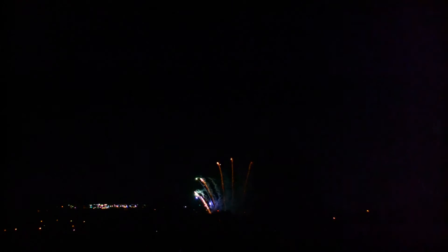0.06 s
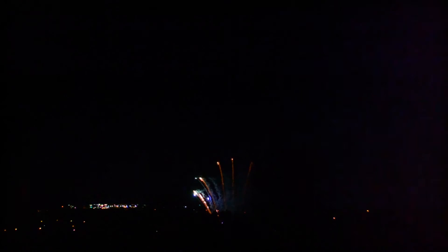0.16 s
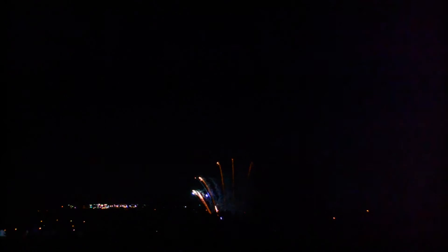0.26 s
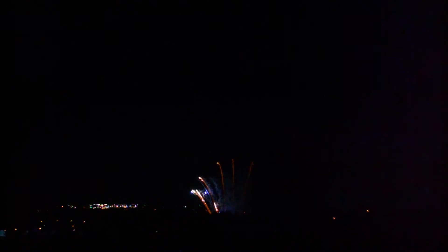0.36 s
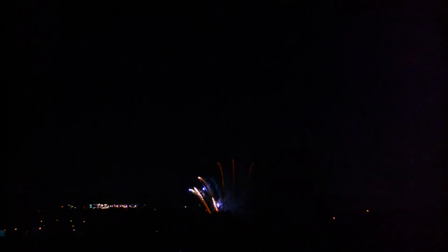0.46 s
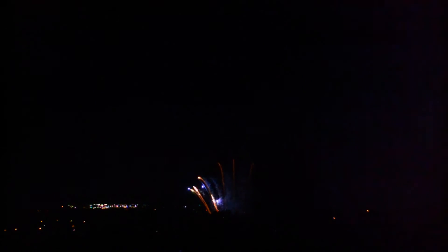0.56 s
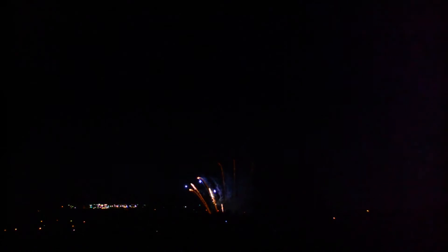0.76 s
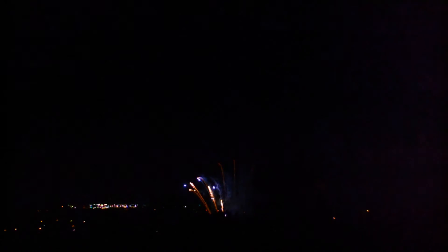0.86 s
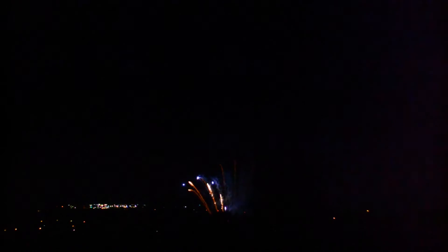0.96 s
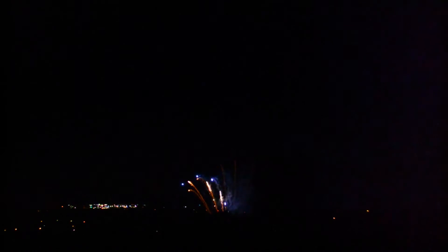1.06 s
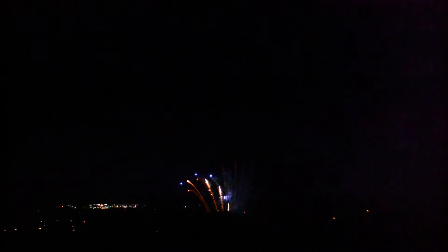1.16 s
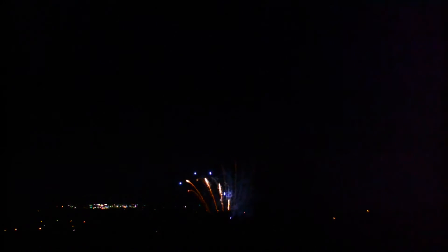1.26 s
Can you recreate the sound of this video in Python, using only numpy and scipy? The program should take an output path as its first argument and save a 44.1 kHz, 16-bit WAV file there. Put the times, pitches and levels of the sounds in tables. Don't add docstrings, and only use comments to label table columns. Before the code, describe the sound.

Two distant firework shells bang hard in quick succession over faint crackle, then rumble away.

```python
import sys
import numpy as np
from scipy import signal
from scipy.fft import rfft, irfft
from scipy.io import wavfile
from scipy.ndimage import uniform_filter1d

SR = 44100
rng = np.random.default_rng(int(sys.argv[2]) if len(sys.argv) > 2 else 0)


def dump(signal):
    limited = np.clip(np.atleast_2d(signal).T, -1, 1)
    pcm = np.round(limited * 32767).astype(np.int16)
    wavfile.write(sys.argv[1], SR, pcm)


def ratio(d):
    e = np.asarray(d, float) / 20
    return 10 ** e


N = 57330


def at_hz(points, hz):
    table_hz, value = np.transpose(points)
    return np.interp(np.log(hz + 1), np.log(table_hz), value)


def colour(x, points):
    hz = np.arange(N // 2 + 1) * SR / N
    y = irfft(rfft(x) * ratio(at_hz(points, hz)), N)
    return y / np.sqrt(np.mean(y ** 2))


def since(start_s):
    return np.maximum(np.arange(N) / SR - start_s, 0)


def swell(start_s, rise_s, fall_s):
    t = since(start_s)
    return (1 - np.exp(-t / rise_s)) * np.exp(-t / fall_s)


def grains(rate_per_s, spread_db):
    hits = rng.random(N) < rate_per_s / SR
    size = ratio(spread_db * np.minimum(rng.exponential(1, N), 4))
    return hits * size * rng.choice([-1, 1], N)


def snap(start_s, peak_db, pitch_hz):
    cycles = since(start_s) * pitch_hz
    bell = np.exp(-((cycles - .65) / .6) ** 2)
    return -ratio(peak_db + 1) * np.sin(2 * np.pi * cycles) * bell * (cycles < 3)


FLICKER_DB, FLICKER_PER_S = 0.93, 27


def flicker():
    knots = rng.standard_normal(int(N / SR * 60) + 2)
    place = np.arange(N) / SR * FLICKER_PER_S
    return ratio(FLICKER_DB * np.interp(place, np.arange(len(knots)), knots))


# time in seconds, level in dB.
STAR_VIGOUR = [(0, -32.5), (.06, -31.5), (0.099, -32.5), (.13, -31.5), (0.199, -32.5), (.6, -31.5),
               (.84, -33.5), (.9, -35.5), (1.22, -38.5), (1.3, -35.5)]
# frequency in Hz, level in dB per Hz.
CRACKLE_SPECTRUM = [(30, -15.5), (100, -18.5), (230, -14), (850, -1), (2700, -4), (5000, -11),
                    (7500, -25.5), (10000, -44.5)]
# start in seconds, peak in dB.
LOUD_POPS = [(.0218, -21), (.0585, -21), (.0612, -18), (.0785, -20), (.1162, -22), (.1238, -21),
             (.1388, -18), (.1638, -21), (.1732, -22), (.1873, -21), (.835, -23), (.865, -23), (.9565, -25),
             (.996, -25), (1.285, -25)]
POPS_PER_S, POP_SPREAD_DB, POP_HZ = 4500, 3.5, 2300


def crackle():
    level_db = np.interp(np.arange(N) / SR, *np.transpose(STAR_VIGOUR))
    out = ratio(level_db) * flicker() * colour(grains(POPS_PER_S, POP_SPREAD_DB), CRACKLE_SPECTRUM)
    for start_s, peak_db in LOUD_POPS:
        out += snap(start_s, peak_db - 1.5, POP_HZ * rng.uniform(.7, 1.4))
    return out


# start in seconds, strength in dB, blast length in seconds,
# ground bounce in dB, second bounce in dB.
SHELLS = [
    (.2418, 22, .001, -1.2, -9),
    (.38596, 20.8, .0013, -2.8, -15),
]
# ground bounce in seconds, second bounce in seconds.
BOUNCE_LAG_S = [
    (.00311, .00554),
    (.00319, .0056),
]
AIR_CUT_HZ, MIC_CUT_HZ, MIC_Q = 1700, 198, 1.22


def blasts():
    out = np.zeros(N)
    for (start_s, db, length_s, *bounce_db), lags_s in zip(SHELLS, BOUNCE_LAG_S):
        for lag_s, loss_db in zip((0, *lags_s), (0, *bounce_db)):
            t = since(start_s + lag_s)
            u = t / length_s
            onset = np.minimum(t * SR, 1)
            out -= ratio(db + loss_db) * (1 - u) * np.exp(-u) * onset
    w = 2 * np.pi * MIC_CUT_HZ
    b, a = signal.bilinear([1, 0, 0], [1, w / MIC_Q, w * w], SR)
    out = signal.lfilter(b, a, out + 1e-18)
    out = signal.lfilter(b, a, out)
    return signal.lfilter(*signal.butter(2, AIR_CUT_HZ, fs=SR), out)


# frequency in Hz, level in dB per Hz.
RUMBLE_SPECTRUM = [(25, -45), (45, -17), (177, 1), (400, -4), (650, 1), (1830, -4), (5000, -19),
                   (10500, -24.5)]
# frequency in Hz, time to fall 60 dB in seconds.
RUMBLE_T60_S = [(60, 3.45), (250, 1.42), (800, 2.5), (3000, 2.23), (9000, 1.5)]
# frequency in Hz, level in dB per Hz.
FAR_SPECTRUM = [(30, -25), (140, -15), (380, 1.5), (750, 2.5), (2000, -7.5), (4300, -22), (7500, -44.5),
                (10000, -51.5)]
RUMBLE_DB, RUMBLE_RISE_S = -20.5, 0.01
FAR_DB, FAR_RISE_S, FAR_T60_S = -26.5, 0.55, 19


def rumble():
    spectrum = rfft(colour(rng.standard_normal(N), RUMBLE_SPECTRUM))
    hz = np.arange(N // 2 + 1) * SR / N
    near = np.zeros(N)
    for centre_hz in 40 * 2. ** np.arange(9):
        octave = np.clip(1 - abs(np.log2((hz + 1) / centre_hz)), 0, 1)
        band = irfft(spectrum * octave, N)
        fall_s = at_hz(RUMBLE_T60_S, centre_hz) / np.log(1000)
        power = sum(swell(shell[0], RUMBLE_RISE_S, fall_s) ** 2 for shell in SHELLS)
        near += band * np.sqrt(power)
    far = swell(SHELLS[0][0], FAR_RISE_S, FAR_T60_S / np.log(1000))
    far = far * colour(rng.standard_normal(N), FAR_SPECTRUM)
    return ratio(RUMBLE_DB) * near + ratio(FAR_DB) * far


# start in seconds, peak in dB, pitch in Hz.
SLAPS = [(.2487, -7, 1600), (.2499, -6, 1800), (.2520, -7, 1400), (.2553, -7, 3200), (.2657, -9, 2800),
         (.2817, -5, 1900), (.3010, -9, 1200), (.3051, -8, 1400), (.4013, -10, 3000), (.4084, -8, 900),
         (.4121, -12, 3000), (.4463, -9, 2500), (.5148, -12, 900)]


def slaps():
    return sum(snap(*row) for row in SLAPS)


# lag in seconds, level in dB, dying time in seconds.
WALLS = [
    (.007, -12.5, 0.009),
    (.023, -16.5, 0.0071),
    (0.038, -16.5, 0.017),
    (0.055, -15, 0.045),
    (0.092, -21.5, 0.041),
    (0.242, -27.5, .03),
]
WALL_SHARE_DB = (1, 2)
# frequency in Hz, level in dB per Hz.
WALL_SPECTRUM = [(50, -43), (110, -6), (190, -2), (250, -3), (620, 0), (3150, -11), (7000, -23.5),
                 (10500, -21)]
WALL_RISE_S, FACETS_PER_S, FACET_SPREAD_DB = 0.00067, 2700, 1.5


def walls():
    power = np.zeros(N)
    for shell, share_db in zip(SHELLS, WALL_SHARE_DB):
        for lag_s, db, fall_s in WALLS:
            power += (ratio(db + share_db) * swell(shell[0] + lag_s, WALL_RISE_S, fall_s)) ** 2
    return np.sqrt(power) * colour(grains(FACETS_PER_S, FACET_SPREAD_DB), WALL_SPECTRUM)


# start in seconds, peak in dB, pitch in Hz.
CRACKS = [
    (.42893, -1, 2200),
    (.42997, 0.5, 3600),
    (.43002, -5, 7500),
]


def cracks():
    return sum(snap(*row) for row in CRACKS)


def scene():
    mono = blasts() + walls() + rumble() + crackle() + slaps() + cracks()
    return np.tile(mono, (2, 1))


GATE_JITTER_DB = 3.0


def gate(z, hz, points):
    power = np.add.reduceat(abs(z) ** 2, np.arange(0, len(hz), 16))
    power = uniform_filter1d(power, size=3, axis=1)
    jitter = uniform_filter1d(rng.standard_normal(power.shape), size=3, axis=1)
    jitter_db = GATE_JITTER_DB * np.sqrt(3) * jitter
    threshold_db = at_hz(points, hz[::16] + 170)[:, None]
    keep = 10 * np.log10(power + 1e-20) + jitter_db > threshold_db
    return z * np.repeat(keep, 16, axis=0)[:len(hz)]


# frequency in Hz, level in dB relative
SIDE_DB = [(60, -15.5), (300, -32), (1000, -29.5), (2000, -25), (5000, -16), (10000, -7.5)]
# frequency in Hz, share of mid.
RIGHT_LEAD = [(1000, 0.003), (3000, 0.035), (10000, .04)]
# frequency in Hz, level in dB relative to the frame's lines.
SMEAR_DB = [(60, -20), (300, -27), (2000, -20), (6000, -14), (9000, -8)]
# frequency in Hz, threshold in dB.
MID_GATE_DB = [(7500, -110), (7700, -70), (9000, -72), (10300, -70)]
# frequency in Hz, threshold in dB.
SIDE_GATE_DB = [(100, -57), (1700, -57), (2200, -72), (4500, -71), (7000, -73), (10000, -76)]
HARDNESS, SLEW_HZ, TOP_CUT_HZ = 2.6, 6000, 10250


def band_limit(x):
    return signal.sosfilt(signal.butter(12, 10610, fs=SR, output="sos"), x)


def record(dry):
    x = dry[0] / (1 + abs(dry[0]) ** HARDNESS) ** (1 / HARDNESS)
    x = 1.03 * signal.lfilter(*signal.butter(1, SLEW_HZ, fs=SR), x)
    x = np.clip(x, -1, 1)

    hz, _, mid = signal.stft(x, SR, nperseg=2048)
    noise = rng.standard_normal((2, 2, *mid.shape))
    side_noise, smear_noise = (noise[0] + 1j * noise[1]) / np.sqrt(2)
    size = np.sqrt(uniform_filter1d(abs(mid) ** 2, size=8, axis=0))
    side = size * side_noise * ratio(at_hz(SIDE_DB, hz))[:, None]
    side = side - mid * at_hz(RIGHT_LEAD, hz)[:, None]
    mid = mid + ratio(at_hz(SMEAR_DB, hz))[:, None] * size * smear_noise
    mid = gate(mid, hz, MID_GATE_DB)
    side = gate(side, hz, SIDE_GATE_DB)
    x = signal.istft(np.array([mid + side, mid - side]), SR, nperseg=2048)[1][:, :N]

    top_cut = signal.cheby2(10, 45, TOP_CUT_HZ * 1.03, fs=SR, output="sos")
    x = signal.sosfilt(top_cut, x)
    return band_limit(np.clip(x, -1, 1))


dry = scene()
out = record(dry)
dump(out)
```